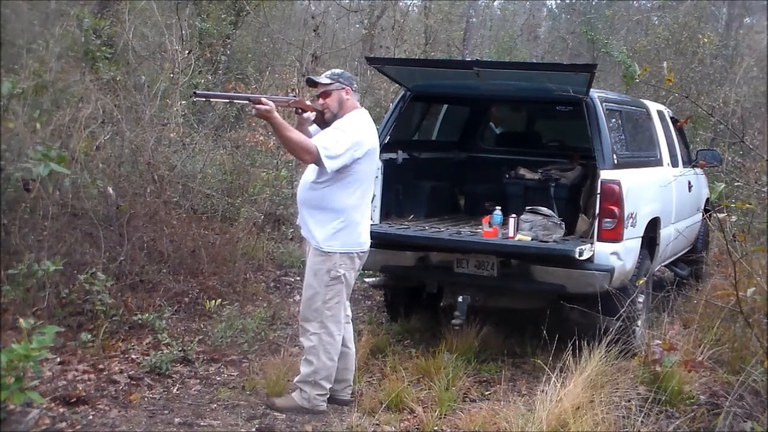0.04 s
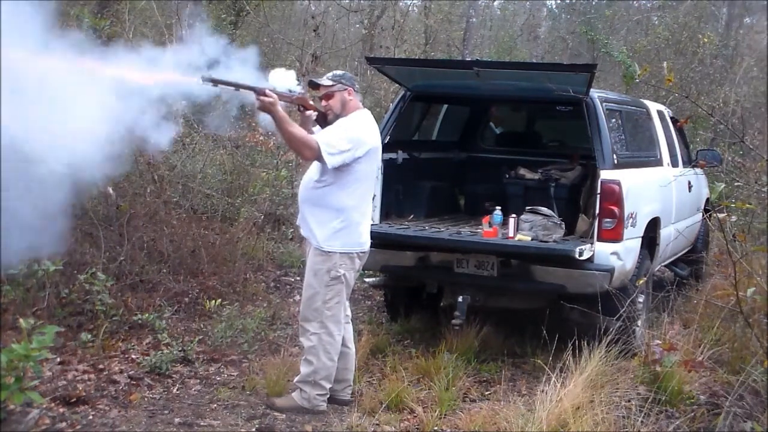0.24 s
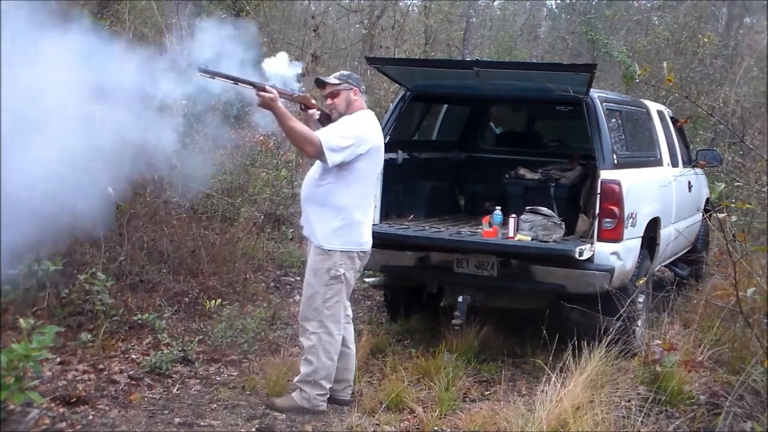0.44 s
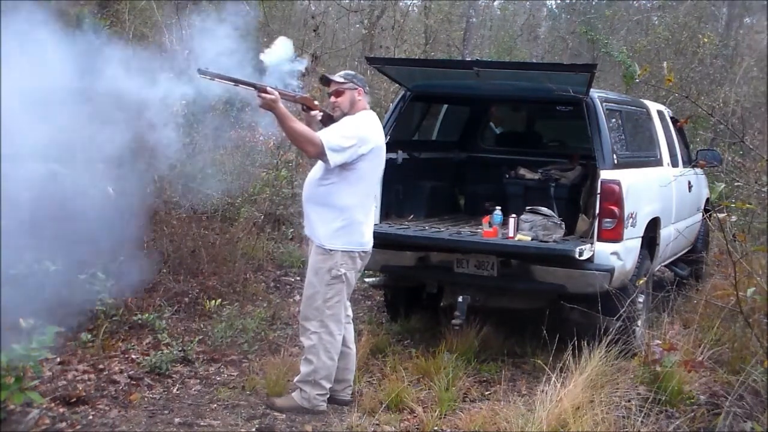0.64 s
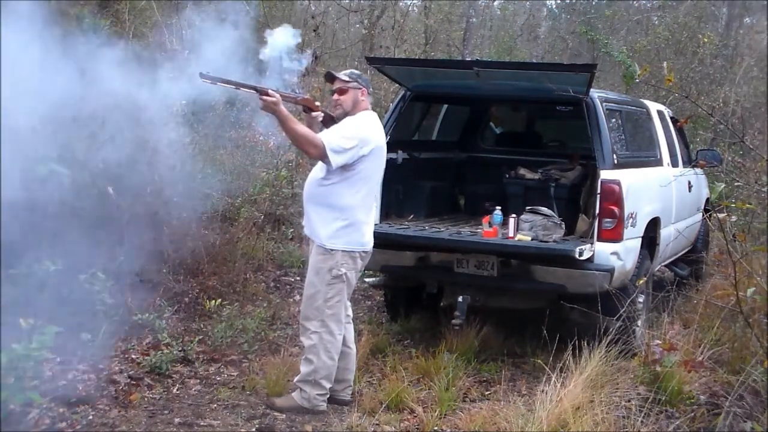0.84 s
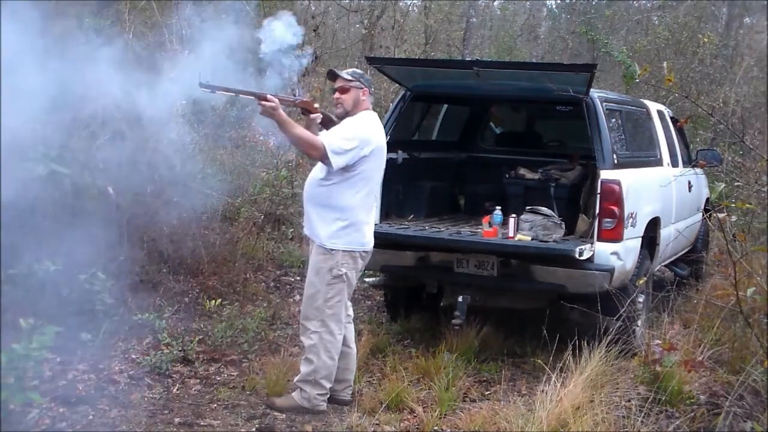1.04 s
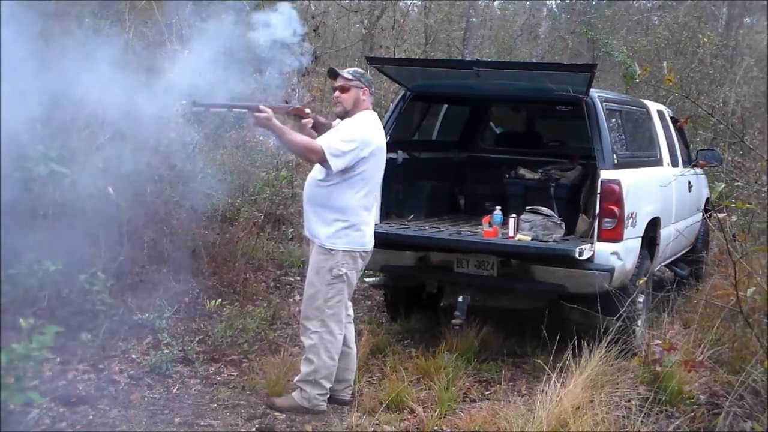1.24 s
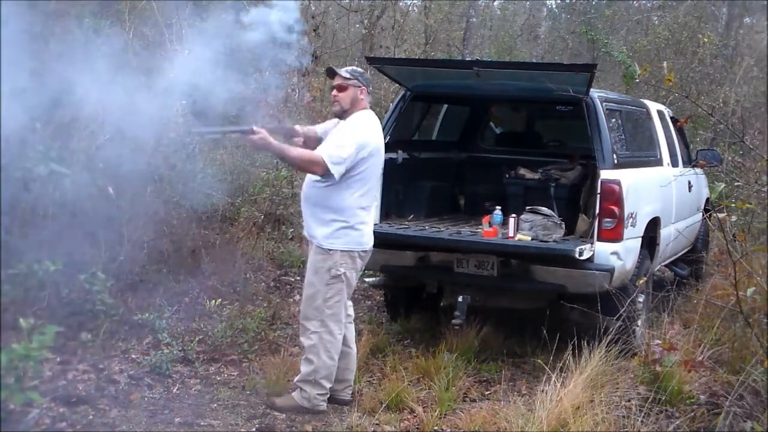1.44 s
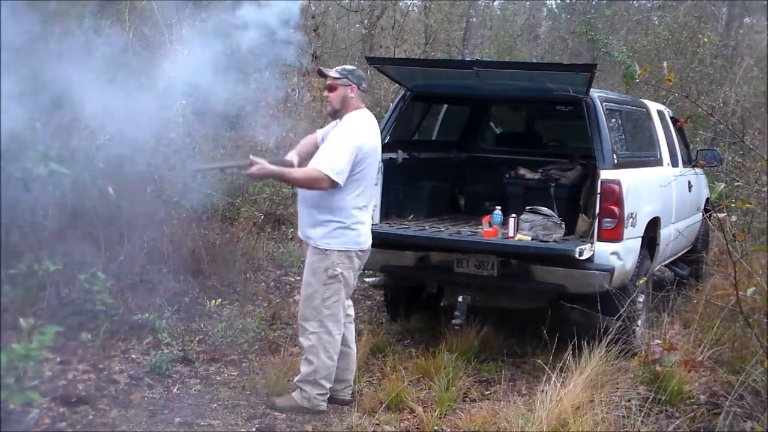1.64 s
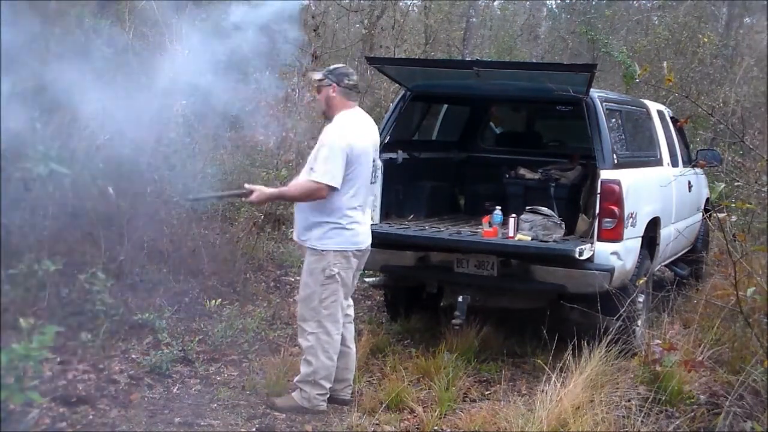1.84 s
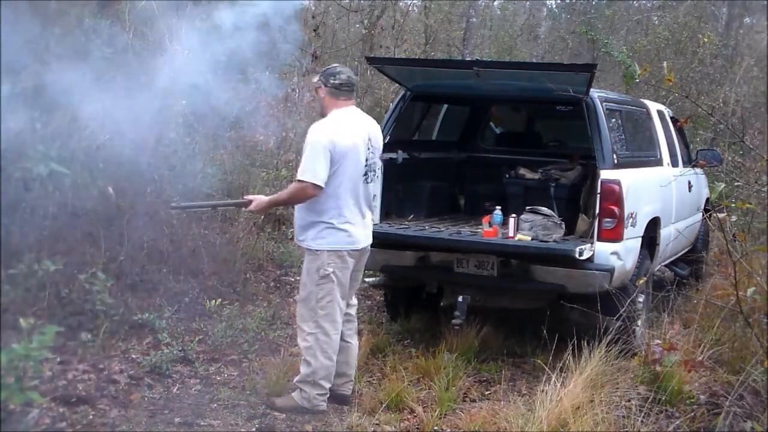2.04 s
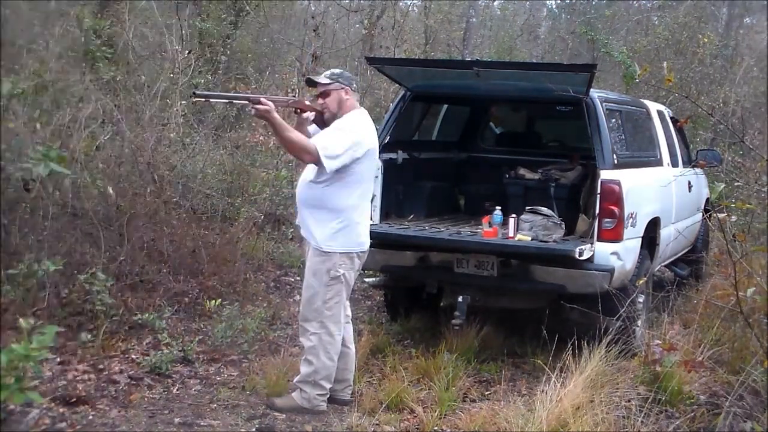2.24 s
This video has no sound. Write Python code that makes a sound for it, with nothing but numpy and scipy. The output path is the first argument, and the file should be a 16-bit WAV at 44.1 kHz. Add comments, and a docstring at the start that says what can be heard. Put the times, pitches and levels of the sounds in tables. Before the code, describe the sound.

One loud flintlock gunshot in a brushy clearing. A quick metallic snap leads straight into the close blast, which overloads the microphone. Sharp echoes slap back, then a long, darkening roll returns from the woods over faint wind.

```python
"""A flintlock fires once in a brushy clearing: the lock snaps, the priming flares, the charge goes off.
The close blast overloads the microphone, booms in an open truck and scatters off the brush.
Single trunks slap back, the edge of the clearing thuds, and the woods return a long, darkening roll.
The gun ticks faintly as it is lowered. Light wind and hiss lie underneath until the sound cuts off."""
import sys
import numpy as np
from scipy import signal
from scipy.fft import rfft, irfft, next_fast_len
from scipy.io import wavfile
from scipy.ndimage import uniform_filter1d, map_coordinates

SR = 44100
rng = np.random.default_rng(int(sys.argv[2]) if len(sys.argv) > 2 else 0)


def pcm_store(signal):
    """Save signal as 16-bit PCM."""
    levels = np.round(np.clip(np.atleast_2d(signal), -1, 1) * 32767)
    wavfile.write(sys.argv[1], SR, levels.astype(np.int16).T)


N = 105840
SHOT_S, END_S = 0.2346, 2.192

# tone of the muzzle blast (frequency [Hz], level [dB])
BLAST_TONE = [(40, -6.5), (140, -3), (230, -12.5), (350, 10.5), (480, -8), (700, -8.5), (1000, -12),
              (1500, 2), (2000, -4), (2600, -1), (5000, -7.5), (9000, -18.5), (15000, -20.5)]
# stereo image of the blast (frequency [Hz], left-right likeness [0-1])
BLAST_LIKENESS = [(60, 0.2), (250, 0.83), (630, 1), (1400, .97), (2800, .6), (5000, 1), (14000, 0.91)]
# flint strikes and scrapes the steel, the pan flies open (time [s], level [dB], t60 [s])
LOCK_STRIKES = [(.1495, -22.5, 0.03), (0.1566, -22.5, .05), (0.167, -26.5, .04), (.181, -39.5, 0.28)]
# ring of the lock's steel (frequency [Hz], width [Hz], boost [dB])
STEEL_MODES = [(1245, 92, 5), (1740, 60, 9.5), (2450, 150, 2), (3400, 110, 7), (4000, 120, 7.5),
               (4370, 200, 3), (5060, 200, 7.5), (9030, 150, 3.5)]
# tone of the flint's scrape and the priming's flare (frequency [Hz], level [dB])
SCRAPE_TONE = [(200, -20), (800, -9), (1500, -7.5), (2700, -2), (4900, -2), (6200, -11.5), (9000, -12.5),
               (14000, -18.5)]
# tick of the gun being lowered (time [s], level [dB], t60 [s])
HANDLING_TICKS = [(1.568, -45, .025)]
# thin, bright tone of that tick (frequency [Hz], level [dB])
TICK_TONE = [(2000, -13), (5800, 5), (8300, -1), (10000, -13), (14000, -20)]
# hollow tone of the open truck (frequency [Hz], level [dB])
BOOM_TONE = [(30, -24.5), (62, -22), (90, -5), (120, -3.5), (145, -2), (190, -4), (230, -15.5),
             (350, -17.5), (480, -30.5), (2000, -72)]
# tone of the scatter off the brush (frequency [Hz], level [dB])
BRUSH_TONE = [(60, -17.5), (150, -14.5), (260, -7.5), (500, -5), (1000, -6), (1650, 1.5), (2000, -3.5),
              (2400, -1.5), (2900, -3.5), (3600, -1), (5200, -3.5), (7000, -9.5), (10000, -13),
              (14000, -22)]
# initial decay of that scatter (frequency [Hz], t60 [s])
BRUSH_DECAY = [(100, 0.62), (400, .46), (1200, 0.57), (3500, 0.47), (7000, 0.39), (14000, 0.33)]
# slapbacks from trunks and thickets (time [s], level [dB], centre frequency [Hz])
TRUNK_SLAPS = [(0.2996, 0, 1503), (.3130, 0.5, 1280), (0.357, -4.5, 1220), (.4014, -3.5, 2430),
               (.4021, -4, 1870), (0.4861, -18, 1216), (0.574, -12, 1100), (1.2427, -13, 898),
               (1.3236, -17.5, 1094)]
# tone of the bark's roughness in each slap (frequency [Hz], level [dB])
BARK_TONE = [(500, 8), (2500, 4), (5000, -13.5), (12000, -21.5)]
# echoes from the edge of the clearing (time [s], level [dB], t60 [s])
EDGE_THUDS = [(.535, -28.5, 0.25), (.573, -24.5, 0.06), (.628, -32.5, 0.45), (.82, -31.5, 0.15)]
# dull tone of those echoes (frequency [Hz], level [dB])
THUD_TONE = [(40, -11), (100, 2.5), (200, -3.5), (330, 2), (750, -0.5), (1500, -10.5), (4000, -29.5),
             (10000, -60)]
# envelope of the roll from the woods, before air loss (time [s], level [dB])
ROLL_LEVEL = [(.25, -24.5), (.55, -26.5), (.66, -28), (.77, -25), (.86, -23), (.92, -26), (1.02, -21.5),
              (1.13, -23.5), (1.23, -21.5), (1.27, -24), (1.4, -23), (1.6, -22.5), (1.75, -25),
              (1.87, -24.5), (2.0, -27), (2.18, -27)]
# tone of the roll, before air loss (frequency [Hz], level [dB])
ROLL_TONE = [(40, -25.5), (120, -21), (210, -29), (330, -3.5), (450, -4), (620, 1), (1000, -2),
             (1650, -2.5), (2100, -10), (2500, -5.5), (3000, -8), (3700, -4), (5000, -13), (7000, -23.5),
             (10000, -27.5), (14000, -40.5)]
# how the air darkens the roll (frequency [Hz], loss [dB/s])
ROLL_LOSS = [(100, 1), (600, -0.5), (1500, 1), (3000, 6), (5000, 13.5), (8000, 20), (14000, 36.5)]
# envelope of the rumble under the roll, before it darkens (time [s], level [dB])
RUMBLE_ENVELOPE = [(.3, -40.5), (.55, -36.5), (.76, -41), (.85, -32), (.92, -41), (.99, -30.5), (1.1, -34),
                   (1.22, -35), (1.5, -36.5), (1.85, -36), (2.15, -38)]
# starting tone of the rumble (frequency [Hz], level [dB])
RUMBLE_TONE = [(25, -16), (50, -10), (75, -1.5), (105, 3), (150, -4), (220, -30), (600, -53)]
# darkening of the rumble; a negative loss swells (frequency [Hz], loss [dB/s])
RUMBLE_DARKENING = [(40, -6), (80, 5), (150, 9.5)]
# bass-heavy tone of the wind (frequency [Hz], level [dB])
WIND_TONE = [(20, -7), (45, 0), (80, -5.5), (140, -24), (300, -35.5), (900, -39), (3000, -69.5)]
# envelope of the background hiss (time [s], level [dB])
HISS_LEVEL = [(0, -53.5), (1.2, -55), (2.19, -49.5)]
# tone of the hiss (frequency [Hz], level [dB])
HISS_TONE = [(200, 12.5), (1500, -10.5), (4000, -8), (14000, -14.5)]
# stereo image of the hiss, wide on top (frequency [Hz], left-right likeness [0-1])
HISS_LIKENESS = [(300, .9), (2000, 0.55), (7000, .13)]
# stereo image of the other noise layers (frequency [Hz], left-right likeness [0-1])
CLEARING_LIKENESS = [(100, 1), (500, 1), (1000, 0.9), (1800, 0.91), (3400, 0.7), (5000, 0.53), (7200, 0.66),
                     (14000, 0.38)]
# pan of every noise layer (frequency [Hz], left minus right [dB])
STEREO_BALANCE = [(100, -0.55), (500, -1.1), (1800, -0.16), (3600, -4), (5200, -1), (8000, 0), (13000, 0.5)]


def muzzle_blast():
    """The charge fires: a violent crack on the overloaded microphone's slow swing, down and back up."""
    crack = amp(14) * noise(BLAST_TONE, likeness=BLAST_LIKENESS) * decay(SHOT_S, t60=0.076)
    down_s, settle_s, settle_hz = 0.017, 0.055, 3.4
    t = since(SHOT_S)
    late = np.maximum(since(SHOT_S + down_s), 0)
    downswing = -0.9 * t / down_s * (t >= 0) * (late == 0)
    upswing = 1.09 * (late > 0) * np.exp(-late / settle_s) * np.cos(2 * np.pi * settle_hz * late)
    thump = -4.7 * bell(since(0.2594), width=0.00068)  # brief and low, within the overloaded blast
    return crack + downswing + upswing + thump


def lock():
    """Each contact of the flint rings the lock's steel; then the priming flares up into the shot."""
    def steel(f):
        return 1 + sum((amp(db) - 1) * 1j * f * width / (hz * hz - f * f + 1j * f * width)
                       for hz, width, db in STEEL_MODES)

    t = since(SHOT_S)
    flare_db, rise_db_per_s = -11.5, 6511.5
    flare = noise(SCRAPE_TONE) * (t < 0) * amp(flare_db - rise_db_per_s * np.abs(t))
    return filtered(bursts(LOCK_STRIKES, SCRAPE_TONE), steel) + flare


def handling():
    """The gun gives a faint tick as it is lowered."""
    return bursts(HANDLING_TICKS, TICK_TONE)


def truck_boom():
    """The blast sets the hollow of the open load space booming briefly."""
    return amp(-14.5) * noise(BOOM_TONE) * decay(SHOT_S, t60=0.61)


def brush_scatter():
    """Dense, grainy reflections build up off nearby twigs and stems; the treble dies first."""
    attack_s = 0.0062
    attack = 1 - np.exp(-np.maximum(since(SHOT_S), 0) / attack_s)
    scatter = noise(BRUSH_TONE, grain_db=2.5)
    return amp(-4) * attack * tail(scatter, lambda hz: 60 / along(BRUSH_DECAY, hz), knee_s=0.24)


def trunk_slaps():
    """Sharp single echoes: a cycle or two of pressure, roughened by the bark."""
    roughness = 0.3 * noise(BARK_TONE) * decay(SHOT_S, t60=1.8)  # farther returns are smoother
    slaps = 0
    for start_s, db, hz in TRUNK_SLAPS:
        cycles = hz * since(start_s)
        slaps = slaps + amp(db) * bell(cycles, width=0.69) * (np.cos(2 * np.pi * cycles) + roughness)
    return slaps


def edge_thuds():
    """The edge of the clearing throws the shot back as dull, smeared thuds."""
    return bursts(EDGE_THUDS, THUD_TONE)


def woods_roll():
    """Countless far echoes, duller the farther they have travelled, over a deep rumble."""
    roll = tail(noise(ROLL_TONE, grain_db=1.03), lambda hz: along(ROLL_LOSS, hz), patchy_db=0.6)
    rumble = tail(noise(RUMBLE_TONE), lambda hz: along(RUMBLE_DARKENING, hz))
    flutter_db = 0.74 * wobble(60)
    return roll * amp(curve(ROLL_LEVEL) + flutter_db) + rumble * amp(curve(RUMBLE_ENVELOPE))


def wind():
    """A light, wavering bed of wind with one small gust just ahead of the shot."""
    gust_db = 13 * bell(since(0.13), width=0.04)
    return noise(WIND_TONE) * amp(-47 + gust_db + wobble(21))


def hiss():
    """A faint, wide hiss that lifts towards the end."""
    return noise(HISS_TONE, likeness=HISS_LIKENESS) * amp(curve(HISS_LEVEL))


def amp(db):
    """Decibels to gain."""
    return 10 ** (np.asarray(db) / 20)


def unit(x):
    """Scale to rms 1."""
    return x / np.sqrt(np.mean(x ** 2) + 1e-20)


def along(points, hz):
    """Read (frequency [Hz], value) points on a log frequency axis."""
    freqs, values = np.transpose(points)
    return np.interp(np.log(hz + 1), np.log(freqs + 1), values)


def since(start_s):
    """Seconds since start_s, for each sample."""
    return (np.arange(N) - round(start_s * SR)) / SR


def curve(points):
    """An envelope through (time [s], value) points."""
    return np.interp(since(0), *np.transpose(points))


def bell(x, width):
    """A smooth swell and fall, peaking at x = 0."""
    return np.exp(-(x / width) ** 2)


def decay(start_s, t60):
    """A hard attack that dies away by 60 dB in t60 seconds."""
    t = since(start_s)
    return (t >= 0) * np.exp(-np.log(1000) * np.maximum(t, 0) / t60)


def wobble(rate):
    """Smooth random modulation, with rate points a second."""
    return map_coordinates(rng.standard_normal(N // 8), [np.arange(N) * rate / SR], mode="wrap")


def filtered(x, response):
    """Equalise x with the gain response(hz)."""
    size = next_fast_len(N + 8192)
    return irfft(rfft(x, size) * response(np.fft.rfftfreq(size, 1 / SR)), size)[..., :N]


def noise(tone, grain_db=0, likeness=CLEARING_LIKENESS, envelope=1):
    """Stereo noise; tone sets its colour, not its level, and grain bunches it into tiny arrivals."""
    def mid_side_eq(hz):
        spread = np.arccos(np.clip(along(likeness, hz), -1, 0.995)) / 2
        gains = amp(along(tone, hz)) * np.array([np.cos(spread), np.sin(spread)])
        return unit(gains) / np.sqrt(2)

    white = rng.standard_normal((2, N)) * amp(grain_db * wobble(700))
    mid, side = filtered(unit(white) * envelope, mid_side_eq)
    stereo = np.array([mid + side, mid - side])
    return filtered(stereo, lambda hz: amp(along(STEREO_BALANCE, hz) * np.array([[0.5], [-0.5]])))


def bursts(hits, tone):
    """Noise hits of one tone, from rows of (time [s], level [dB], t60 [s])."""
    return noise(tone, envelope=sum(amp(db) * decay(start_s, t60) for start_s, db, t60 in hits))


def tail(x, loss, patchy_db=0, knee_s=np.inf):
    """Open x at the shot; each band then loses loss(hz) dB a second, more slowly past the knee."""
    hz, t, bands = signal.stft(x, SR, nperseg=512)
    patches = uniform_filter1d(rng.standard_normal(bands.shape[1:]), size=7, axis=0)
    patches = unit(uniform_filter1d(patches, size=6, axis=1))  # random gain over frequency and time
    age = np.maximum(t - SHOT_S, 0)
    if np.isfinite(knee_s):
        age = knee_s * np.log1p(age / knee_s)
    gain = amp(patchy_db * patches - loss(hz)[:, None] * age)
    return signal.istft(bands * gain, SR, nperseg=512)[1][:, :N] * (since(SHOT_S) >= 0)


def scene():
    """Mix the gun, its echoes from near to far, and the background bed."""
    gun = lock() + muzzle_blast() + handling()
    echoes = truck_boom() + brush_scatter() + trunk_slaps() + edge_thuds() + woods_roll()
    return gun + echoes + wind() + hiss()


def record(dry):
    """The microphone overloads, the sound cuts off hard, and a steep low-pass trims the top."""
    ceiling, hardness, top_hz = 0.97, 7, 14500
    saturated = dry / (1 + np.abs(dry / ceiling) ** hardness) ** (1 / hardness)
    return filtered(saturated * (since(END_S) < 0), lambda hz: 1 / (1 + (hz / top_hz) ** 80))


dry = scene()
out = record(dry)
pcm_store(out)
```